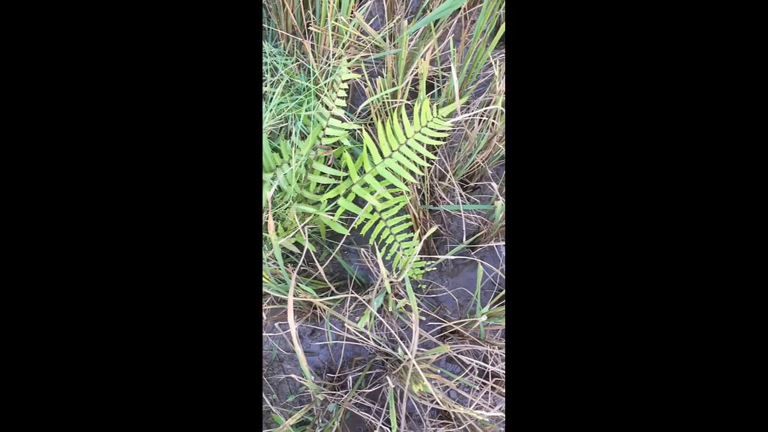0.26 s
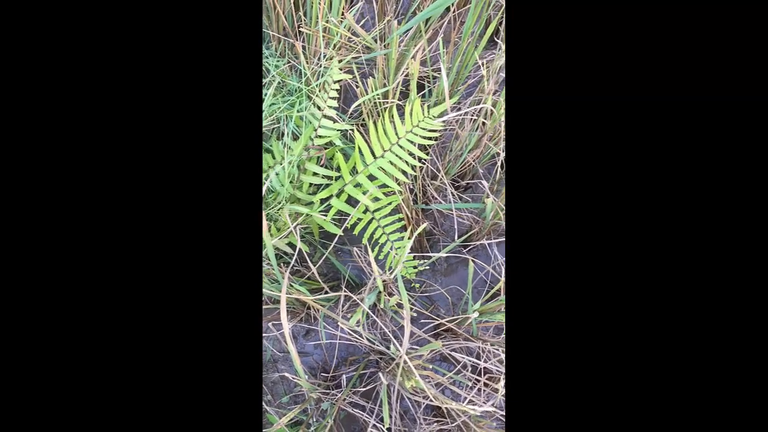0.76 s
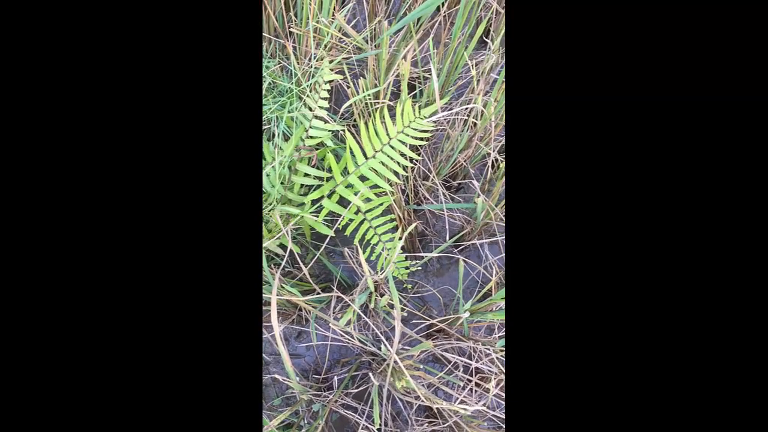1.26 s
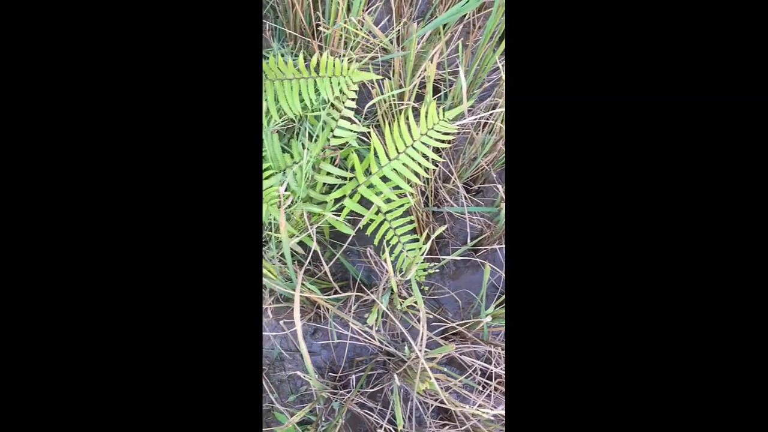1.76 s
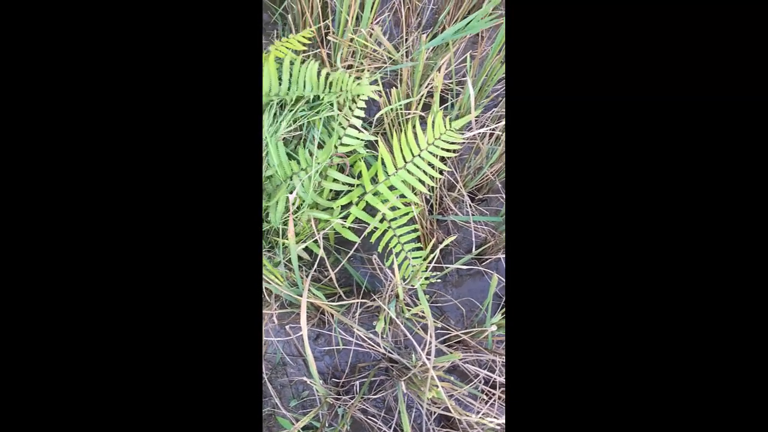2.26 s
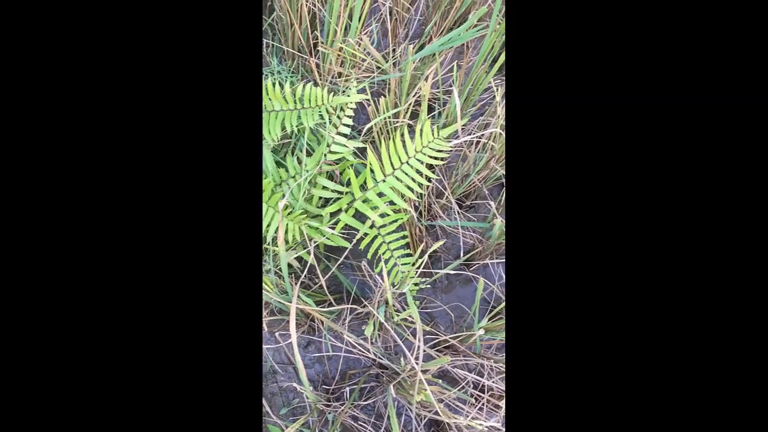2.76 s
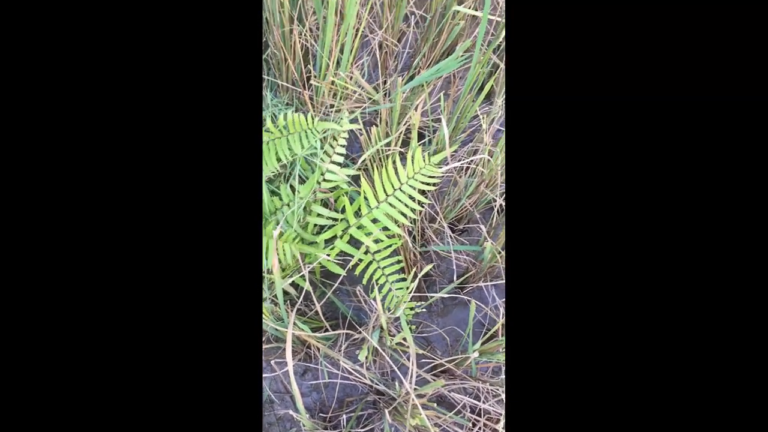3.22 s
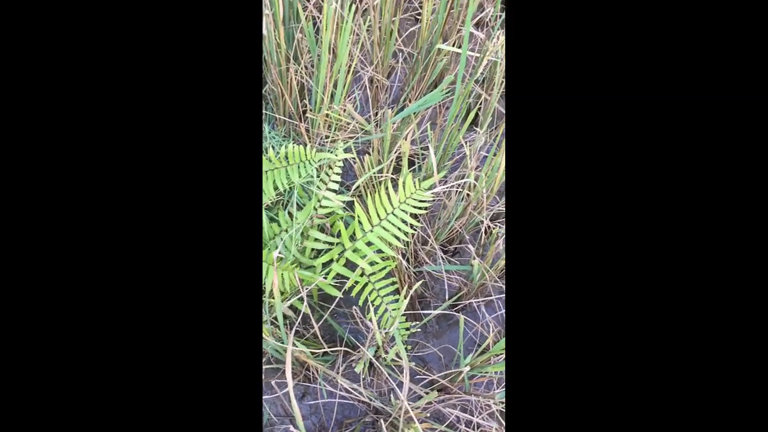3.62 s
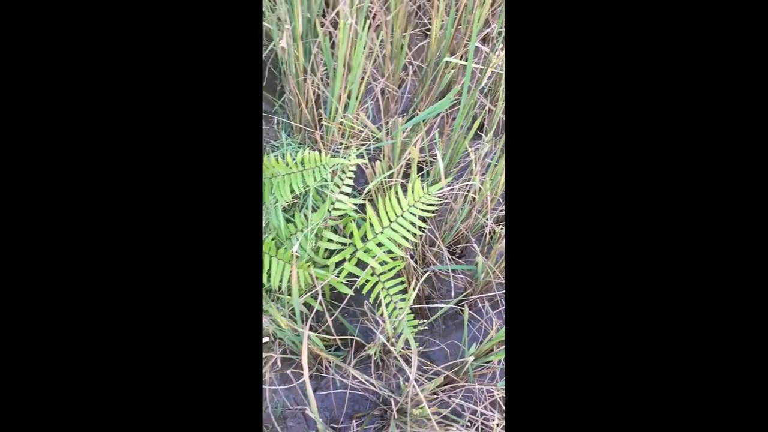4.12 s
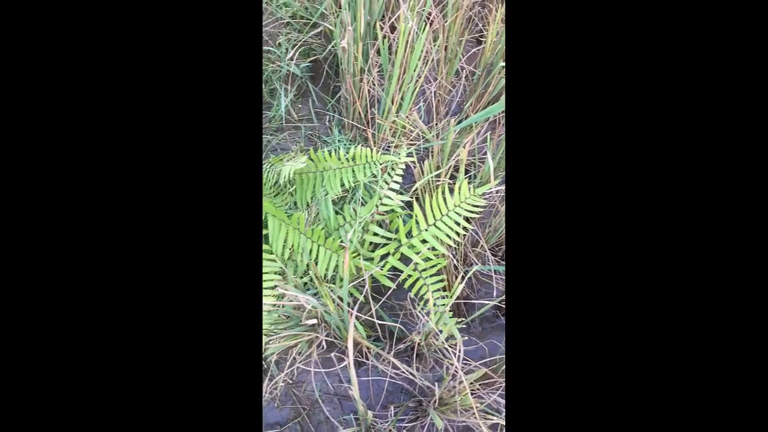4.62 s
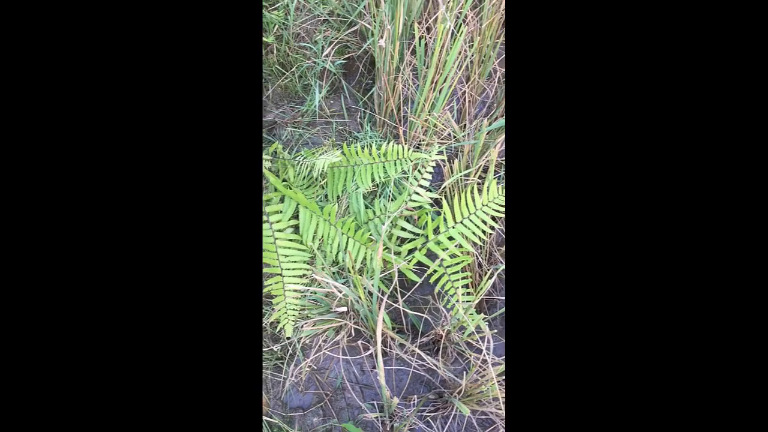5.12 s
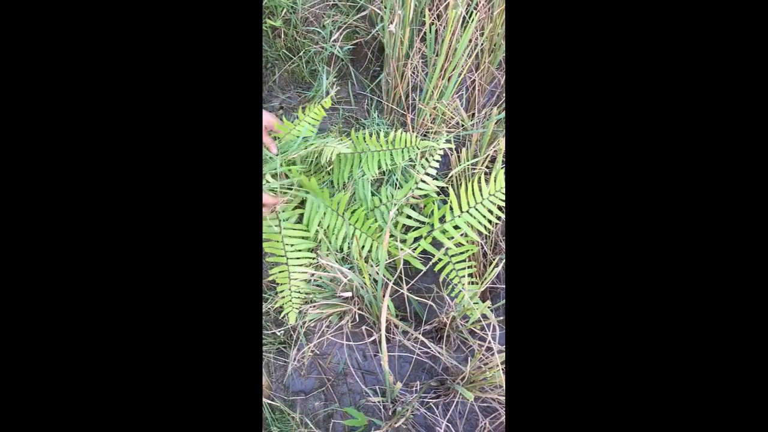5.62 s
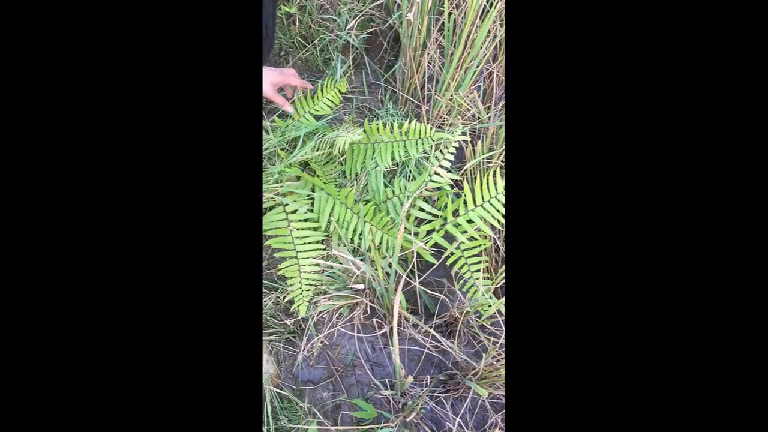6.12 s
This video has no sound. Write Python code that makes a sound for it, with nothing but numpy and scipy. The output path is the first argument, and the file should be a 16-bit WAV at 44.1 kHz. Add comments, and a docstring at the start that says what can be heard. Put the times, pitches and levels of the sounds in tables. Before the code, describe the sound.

Close leafy rustling, two bursts of cracking stems pulled from wet ground, tiny bubbling plips, and paired high insect chirps in a quiet field.

```python
"""Insects chirp and buzz over a faint field hiss while small bubbles plip in waterlogged ground.
Hands stroke through ferns and grass close by: leaves brush as dense tiny clicks and stalks scrape more coarsely.
Twice a handful is torn loose with a wet squelch and snapping stalks, built from bursts of noise that ring.
Late on, a few drops tap a stiff leaf, a short sum of decaying tones. Both channels carry the same sound."""
import sys
import numpy as np
from scipy import signal
from scipy.fft import rfft, irfft
from scipy.io import wavfile
from scipy.ndimage import uniform_filter1d

SR = 44100
rng = np.random.default_rng(int(sys.argv[2]) if len(sys.argv) > 2 else 0)


def put_to_file(sound):
    """Save the sound as 16-bit audio at rate SR, in the file named by the first command-line argument."""
    columns = np.atleast_2d(sound).T  # one column per channel
    safe = np.clip(columns, -1, 1)
    whole_steps = np.round(safe * 32767)
    wavfile.write(sys.argv[1], SR, whole_steps.astype(np.int16))


N = 281358
T = np.arange(N) / SR  # time in s

# spectrum of leaflets sliding and springing: frequency_hz, relative_density_db (per Hz)
LEAF_SPECTRUM = [(200, -30), (700, -24), (1500, -14.5), (3000, -5), (4900, -4.5), (5800, 1.5), (7700, -1.5),
                 (9000, 2), (10400, -3.5), (11500, 0), (16000, -3)]


def undb(db):
    """Decibels to gain."""
    return 10 ** (np.asarray(db) / 20)


def unit(x):
    """Scale to rms 1."""
    return x / np.sqrt(np.mean(x ** 2))


def colour(x, points):
    """Shape a sound with a spectral curve of (Hz, dB) points; rms 1."""
    hz, db = np.transpose(points)
    bin_hz = np.maximum(np.arange(N // 2 + 1) * SR / N, 1)
    curve_db = np.interp(np.log(bin_hz), np.log(hz), db)
    return unit(irfft(rfft(x) * undb(curve_db), N))


def ring(x, hz, width_hz):
    """A two-pole resonance, gain 1 at the centre."""
    hz = min(hz, SR * .45)
    sharpness = hz / min(width_hz, SR / 4)
    b, a = signal.iirpeak(hz, sharpness, fs=SR)
    return signal.lfilter(b, a, x)


def walk(points_per_s):
    """A random wander of rms 1, drawn as straight lines between random points."""
    count = 8192
    return unit(np.interp(T * points_per_s, np.arange(count), rng.standard_normal(count)))


def clicks(per_s, spread_db):
    """Random clicks of either sign whose sizes scatter exponentially in dB; rms 1."""
    size = undb(spread_db * np.minimum(rng.exponential(size=N), 5))
    happens = rng.random(N) < per_s / SR
    return unit(happens * size * rng.choice([-1, 1], N))


def swell(start_s, hold_s, attack_s, release_s):
    """Rise exponentially to 1 at the start, hold, then die away."""
    rise = np.minimum((T - start_s) / attack_s, 0)
    fall = np.minimum((start_s + hold_s - T) / release_s, 0)
    return np.exp(np.maximum(rise + fall, -40))


def add(out, s, x):
    """Mix a short sound in at time s."""
    i = max(int(s * SR), 0)
    out[i:i + len(x)] += x[:max(N - i, 0)]


def field():
    """Faint hiss of the open air: coloured noise that wavers slightly in level."""
    # frequency_hz, relative_density_db (per Hz)
    hiss_spectrum = [(20, -19), (35, -5), (55, 3), (100, 0.6), (200, -3.8), (500, -6), (800, -10.2),
                     (1200, -3.5), (2000, -9.5), (5000, -28.5), (9000, -15.5), (16000, -10)]
    level_db = -63.5 + .5 * walk(3.2)
    return undb(level_db) * colour(rng.standard_normal(N), hiss_spectrum)


def chirp(hz, length_s):
    """A short whistle on a wavering, arched pitch; loudest 0.05 s in, 1/e at length_s either side."""
    t = T[:SR // 10] - 1 / 20
    waver = unit(uniform_filter1d(rng.standard_normal(len(t)), size=60))
    pitch_hz = hz - 2200 * t - 110000 * t ** 2 + 60 * waver
    return np.exp(-(t / length_s) ** 2) * np.sin(2 * np.pi * np.cumsum(pitch_hz) / SR)


def insects():
    """A near insect chirps in strict pairs, neighbours chirp loosely, far ones buzz in throbbing noise bands."""
    # loudness curve of the near insect: time_s, relative_level_db
    near_level = [(0, -65), (2.7, -58), (3.2, -57.5), (3.6, -51), (4.1, -48), (4.7, -51), (5.1, -52.5),
                  (6.3, -58)]
    # faint chirping insects: pitch_hz, relative_level_db, chirps_per_s
    neighbours = [(7200, -53.5, 8.6), (7660, -57, 3)]
    # far buzzing insects: pitch_hz, width_hz (of each resonance), level_db, bursts_per_s, one_burst_s (its peak)
    chorus = [(9160, 310, -66.5, 4.75, 3.41), (8440, 740, -71, 3, 0.18), (7230, 1400, -65.5, 2.386, 3.27)]
    first_pair_s, pair_every_s, pair_gap_s = .066, .309, .077
    out = np.zeros(N)
    for pair_s in np.arange(first_pair_s, T[-1], pair_every_s):
        db = np.interp(pair_s, *np.transpose(near_level))
        for peak_s in (pair_s, pair_s + pair_gap_s):
            add(out, peak_s - 1 / 20, undb(db + 5.0) * chirp(7206, length_s=0.015))
    for hz, db, rate in neighbours:
        for k, (late, loud) in enumerate(rng.standard_normal((64, 2))):
            add(out, (k + 0.48 * late) / rate, undb(db + 0.95 * loud) * chirp(hz, length_s=0.012))
    for hz, width_hz, db, rate, burst_s in chorus:
        buzz = ring(ring(rng.standard_normal(N), hz, width_hz), hz, width_hz)
        throb_db = 3.3 * np.cos(2 * np.pi * rate * (T - burst_s)) + 2 * walk(25)
        out += undb(db) * unit(buzz * undb(throb_db))
    return out


def bubble(hz, decay_s):
    """A bubble swells, rings briefly and rises a little in pitch."""
    t = T[:3000]
    envelope = (1 - np.exp(-t / 0.0011)) * np.exp(-t / decay_s)
    return envelope * np.sin(2 * np.pi * hz * (t + 1.24 * t ** 2))


def bubbles():
    """A few clear bubbles stand out from many faint ones as the trodden mud seeps."""
    # the clearest bubbles: start_s, starting_pitch_hz, relative_level_db
    clear_bubbles = [(0.177, 1194, -53), (.203, 1150, -51.5), (.968, 227, -44), (1.05, 200, -54),
                     (1.082, 201.4, -50.5), (1.276, 1170, -55), (2.291, 187, -58.5), (2.9, 1380, -58.5),
                     (3.186, 522, -55.5), (3.187, 273, -58), (3.234, 1214, -59), (3.258, 357, -58.5),
                     (3.32, 1340, -55.5), (3.334, 1140, -51.5), (3.35, 990, -55), (3.416, 1204, -56.5),
                     (3.586, 480, -64), (3.665, 1270, -59), (3.92, 1224, -57), (3.94, 1130, -57),
                     (5.122, 1568, -56.5), (5.3, 1004, -59.5), (5.622, 674, -59.5), (5.699, 1234, -56)]
    out = np.zeros(N)
    for s, hz, db in clear_bubbles:
        add(out, s, undb(db + 8.0) * bubble(hz, decay_s=0.0082))
    for when, pitch, size in rng.random(size=(130, 3)):
        hz = 1230 * 2 ** (1.1 * (pitch - .55))
        add(out, when * T[-1], undb(-61.5 + 8.2 * size ** 2) * bubble(hz, decay_s=0.0089))
    for when, pitch, size in rng.random(size=(55, 3)):  # larger pockets plop lower
        hz = 200 * 4 ** pitch
        add(out, when * T[-1], undb(-69 + 10 * size ** 2) * bubble(hz, decay_s=0.0085))
    return out


def strokes():
    """How hard leaves and stalks are rubbed; overlapping strokes add in power."""
    # strokes of the hands: full_speed_s, hold_s, attack_s, release_s, relative_level_db,
    # stalk_share_db (the coarser scrape against the leaves)
    hand_strokes = [(0.216, .03, .025, 0.022, -43.5, -6), (0.499, 0.23, 0.13, 0.063, -37, -7.5),
                    (0.912, 0.043, 0.064, 0.059, -28, -10.5), (1.198, 0.025, 0.3, 0.11, -41.5, -11),
                    (1.393, .11, 0.15, 0.066, -42.5, -7), (1.663, 0.032, 0.14, 0.047, -45.5, -7),
                    (1.786, 0.039, 0.048, 0.063, -46.5, -5.5), (1.955, 0.033, 0.023, 0.042, -41, -6),
                    (2.111, 0.035, 0.078, 0.032, -37.5, -5.5), (2.264, 0.033, 0.051, 0.079, -42.5, -5.5),
                    (2.404, 0.052, 0.11, 0.11, -50, -5), (2.569, 0.017, 0.049, 0.031, -44.5, -2),
                    (2.678, 0.012, 0.033, 0.05, -41, -4.5), (2.841, 0.035, 0.17, 0.014, -51.5, -3.5),
                    (3.023, .02, 0.055, 0.034, -48.5, -3), (3.103, .05, 0.036, 0.066, -45, -3),
                    (3.285, 0.023, 0.023, 0.042, -51.5, -2.5), (3.903, 0.13, 0.153, .06, -45, -13),
                    (4.074, 0.24, 0.098, 0.043, -40.5, -7.5), (4.3, 0.12, 0.04, 0.09, -34.5, -10),
                    (4.542, 0.12, 0.11, 0.094, -40, -7.5), (4.764, 0.15, 0.091, .085, -47, -18),
                    (5.131, 0.1, 0.032, 0.078, -51, -6), (5.5, 0.15, 0.127, .07, -52, -6.5),
                    (5.853, 0.077, 0.1, 0.061, -48.5, -9.5), (6.014, 0.01, 0.024, 0.11, -50.5, -2.5),
                    (6.183, .025, 0.0087, 0.01, -54, -6.5)]
    sway_db, sway_s = -13, 0.16  # after a stroke the leaves sway on softly
    leaf_power, stalk_power = np.zeros(N), np.zeros(N)
    for s, hold_s, attack_s, release_s, db, stalk_db in hand_strokes:
        rub = swell(s, hold_s, attack_s, release_s)
        sway = undb(sway_db) * swell(s, hold_s, attack_s, sway_s)
        power = undb(db) ** 2 * (rub ** 2 + sway ** 2)
        leaf_power += power
        stalk_power += power * undb(stalk_db) ** 2
    return np.sqrt(leaf_power), np.sqrt(stalk_power)


def shimmer(x, depth_db):
    """Ever-changing leaves take their turn: small patches of time and pitch swell and fade at random."""
    frames = signal.stft(x, nperseg=512)[2]
    across_pitch = uniform_filter1d(rng.standard_normal(frames.shape), size=5, axis=0)
    patches = uniform_filter1d(across_pitch, size=4, axis=1)
    return unit(signal.istft(frames * undb(depth_db * unit(patches)))[1][:N])


def rustle(leaf_rub, stalk_rub):
    """Leaflets slide in fine clicks, stalks scrape in coarser ones; both catch and slip together."""
    # frequency_hz, relative_density_db (per Hz)
    stalk_spectrum = [(150, -24.5), (450, -17.5), (620, -9), (850, -12.5), (1500, -8), (2200, -2),
                      (3000, 0), (4100, -0.5), (5000, -6.5), (9000, -31.5)]
    grip = undb(1.0 * walk(90) + 1.3 * walk(25))
    leaves = shimmer(colour(clicks(per_s=12000, spread_db=3.0), LEAF_SPECTRUM), depth_db=1.83)
    # the negative spread makes a few clicks smaller than the rest
    stalks = shimmer(colour(clicks(per_s=2500, spread_db=-1.5), stalk_spectrum), depth_db=3.0)
    return grip * (undb(-0.52) * leaf_rub * leaves + undb(-1.06) * stalk_rub * stalks)


def crackle(leaf_rub):
    """Lone leaflets spring free as sharp ticks, which stand out most when the hands move gently."""
    ticks = colour(clicks(per_s=170, spread_db=4.0), LEAF_SPECTRUM)
    return undb(-25.5) * leaf_rub ** 0.75 * ticks


def snap(db, hz, knock_db):
    """Fibres tear in a quick burst that rings the stalk and knocks at its root; nearby stems scatter a tail."""
    t = T[:2048]
    fibres = rng.standard_normal(len(t))
    # weaker stalks give way more slowly: the tear doubles for every 7 dB less, within limits
    tear_s = np.clip(.0012 * 2 ** ((-21.5 - db) / 7), .0007, .002)
    tail = undb(-19) * np.exp(-t / .006)
    burst = np.tanh(fibres) * (np.exp(-t / tear_s) + tail)
    crack = ring(burst, 5100, 5500)
    stalk = ring(ring(burst, hz, hz * 0.82), hz, hz * 0.82)
    thud = fibres * np.exp(-t / (tear_s + 0.0052))
    knock = ring(thud, 290, 380) + undb(-5) * ring(thud, 600, 260) + undb(-6) * ring(thud, 1100, 400)
    sound = undb(-5) * unit(crack) + undb(-6.0) * unit(stalk) + undb(knock_db) * unit(knock)
    return undb(db) * sound * np.sqrt(tear_s / t[-1])  # a longer tear carries more energy


def breaking(force, per_s, loud_db, hz, knock_db):
    """Small snaps at random moments, louder where the force behind them is greater."""
    out = np.zeros(N)
    for k, (when, size, pitch) in enumerate(rng.random(size=(512, 3))):
        s = (k + when) / per_s
        if s < T[-1] and force[int(s * SR)] > undb(-60):
            db = 20 * np.log10(force[int(s * SR)]) + loud_db - 8 * size
            add(out, s, snap(db, hz * 2 ** (1.8 * (pitch - .5)), knock_db))
    return out


def snaps(leaf_rub, tug):
    """Thick stalks snap loudly; thin stems break under each stroke and rootlets under each tug."""
    # start_s, relative_level_db, ring_hz, knock_db (dull knock within the snap)
    thick_stalks = [(.292, -38.5, 9100, -20), (0.587, -37, 6900, -37), (0.6824, -28.5, 2760, -24),
                    (.722, -22.5, 3080, -20), (0.722, -20.5, 10600, -30), (0.7974, -20.5, 2720, -15.5),
                    (0.8349, -20, 2550, -17), (.839, -16, 2550, -8.5), (0.8647, -17.5, 2570, -12.5),
                    (0.8913, -13.5, 2430, -15), (.902, -20, 2196, -8), (.923, -11, 2550, -17.5),
                    (1.0815, -31, 7200, -36), (1.23, -35.5, 3020, -25.5), (1.364, -35, 5730, -22),
                    (1.5, -32, 3000, -20.5), (1.778, -38, 3320, -19), (2.137, -35.5, 5570, -16),
                    (2.5669, -35, 2700, -40), (2.6783, -42.5, 3200, -19), (3.189, -58, 900, 7),
                    (4.1232, -22.5, 4000, -28), (4.1846, -29, 8460, -16), (4.204, -32, 7850, -12.5),
                    (4.2604, -21, 3270, -15.5), (4.2847, -26, 2400, -15), (4.29, -24, 2600, -5.5),
                    (4.3145, -25, 5700, -16), (4.3302, -15, 2180, -13), (4.3621, -19.5, 6500, -20),
                    (4.372, -26, 4000, -11.5), (4.3829, -24, 2900, -12.5), (4.3907, -29, 3400, -9),
                    (4.401, -20, 2765, -26), (4.419, -23.5, 4180, -20), (4.434, -25, 2390, -13),
                    (4.469, -24.5, 3470, -16), (4.4788, -32, 3520, -21), (4.5475, -28, 2910, -17),
                    (4.5914, -21, 2665, -26), (4.6114, -19.5, 2680, -10.5), (4.6239, -24.5, 1670, -39),
                    (4.6564, -29, 4740, -33), (4.6974, -30, 2880, -23), (4.7642, -31.5, 1710, -17),
                    (4.816, -34, 7050, -23), (5.925, -34.5, 7440, -33), (6.031, -45, 6900, -5.5)]
    out = np.zeros(N)
    for s, db, hz, knock_db in thick_stalks:
        add(out, s, snap(db, hz, knock_db))
    stems = breaking(leaf_rub, per_s=14, loud_db=2.5, hz=4300, knock_db=-17)
    rootlets = breaking(tug, per_s=55, loud_db=8.5, hz=2740, knock_db=-13)
    return out + stems + rootlets


def tugs():
    """How hard the roots are pulled from the wet ground; overlapping tugs add."""
    # full_force_s, hold_s, relative_level_db
    pulls = [(0.834, 0.012, -47.5), (.902, 0.079, -43), (4.305, .04, -47), (4.362, 0.068, -44.5),
             (4.537, .02, -51.5), (4.609, 0.067, -47.5), (4.761, .005, -59)]
    return sum(undb(db) * swell(s, hold_s, attack_s=0.008, release_s=0.045) for s, hold_s, db in pulls)


def squelch(tug):
    """Roots drag through wet mud: low, uneven crackling while a handful is pulled."""
    # frequency_hz, relative_density_db (per Hz)
    mud_spectrum = [(25, -54), (42, -28), (58, 0.5), (100, 1.5), (280, -4.5), (460, -6), (600, 2),
                    (780, -5.5), (1100, -0.5), (1400, 0), (2500, -1), (6000, -33.5)]
    unevenness = undb(-4 + 6.1 * walk(70))
    return tug * unevenness * colour(clicks(per_s=2000, spread_db=1.5), mud_spectrum)


def drops():
    """A drop taps a stiff leaf, whose decaying modes make a short hollow tick."""
    # the struck leaf: mode_hz, relative_level_db, t60_s
    leaf_modes = [(1720, -4, 0.038), (1970, -6, 0.019), (2380, 0, 0.019), (2730, 0, .015),
                  (3050, 1.5, 0.022), (3230, 1.5, 0.014), (3920, -2, 0.017), (4550, -3, 0.036)]
    # drops falling: start_s, peak_level_db
    falls = [(5.128, -39), (5.14, -47), (5.2135, -25.5), (5.2168, -44)]
    out, tick, t = np.zeros(N), np.zeros(4096), T[:4096]
    for k, (hz, db, t60) in enumerate(leaf_modes):
        sign = (-1) ** k  # neighbouring modes start in opposite directions
        tick += sign * undb(db - 60 * t / t60) * np.sin(2 * np.pi * hz * t)
    for s, db in falls:
        add(out, s, undb(db) * tick / abs(tick).max())
    return out


def scene():
    """All sources reach one microphone, the same in both channels."""
    leaf_rub, stalk_rub = strokes()
    tug = tugs()
    hands = rustle(leaf_rub, stalk_rub) + crackle(leaf_rub) + snaps(leaf_rub, tug) + squelch(tug)
    return np.tile(field() + insects() + bubbles() + hands + drops(), (2, 1))


def record(dry):
    """The recorder thins the deepest bass and cuts the top steeply."""
    bass_cut = signal.butter(4, 42, "high", fs=SR, output="sos")
    top_cut = signal.ellip(12, .1, 80, 15950, fs=SR, output="sos")
    return signal.sosfilt(top_cut, signal.sosfilt(bass_cut, dry))


dry = scene()
out = record(dry)
put_to_file(out)
```